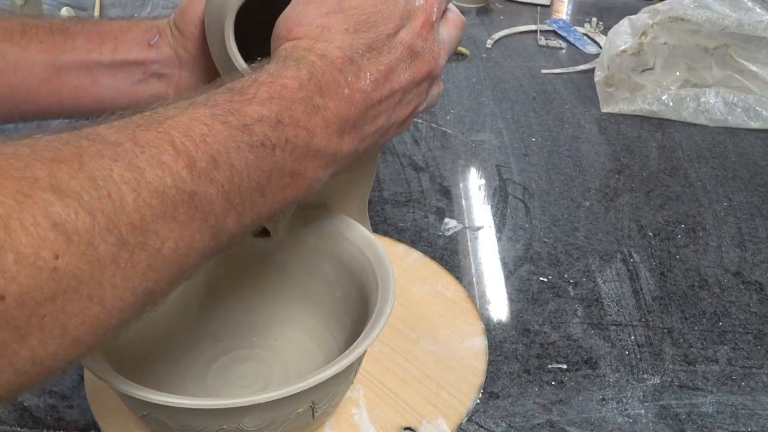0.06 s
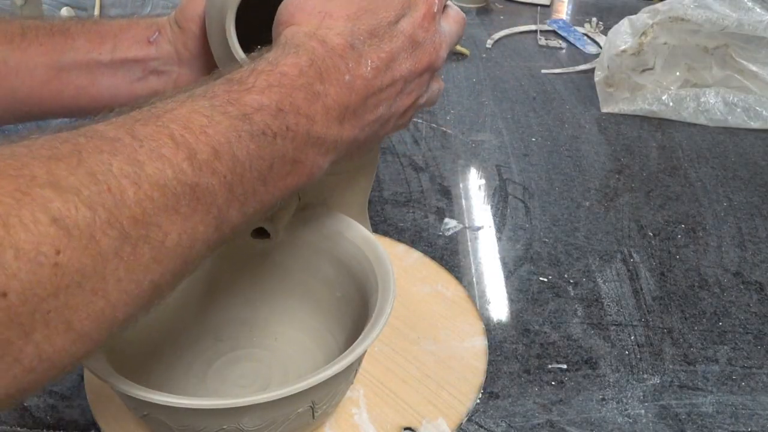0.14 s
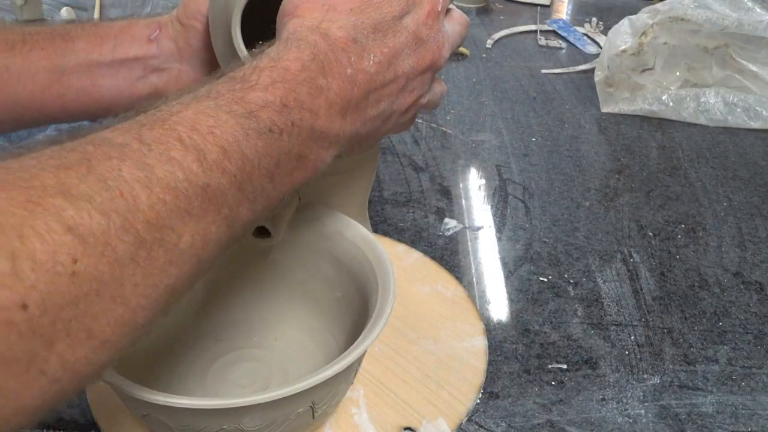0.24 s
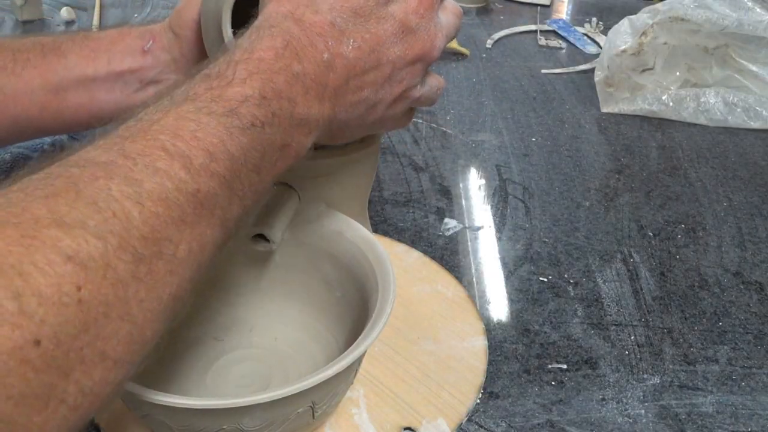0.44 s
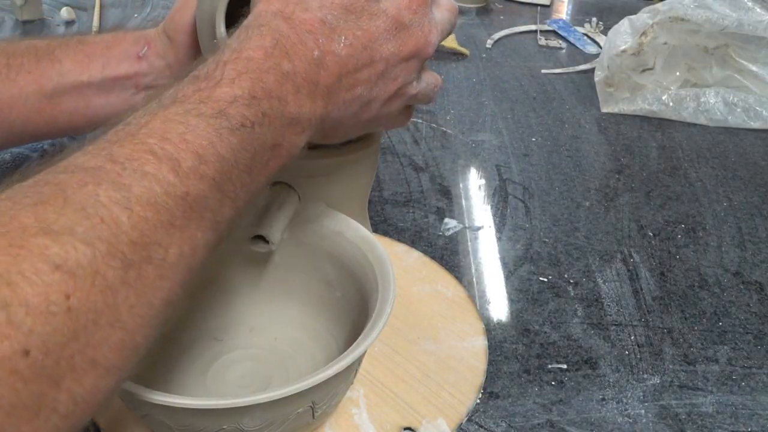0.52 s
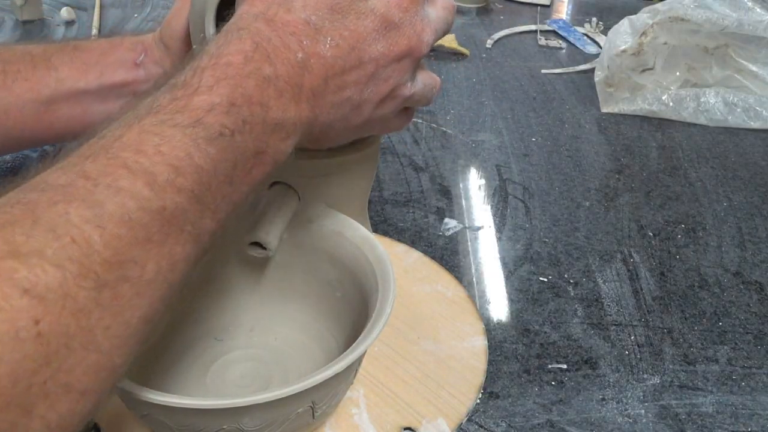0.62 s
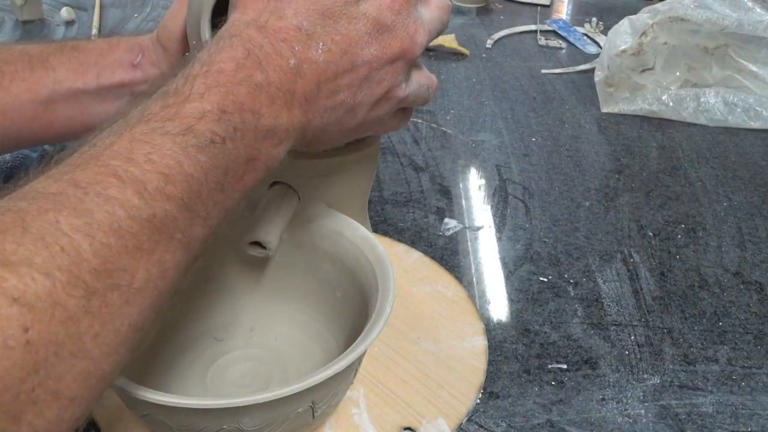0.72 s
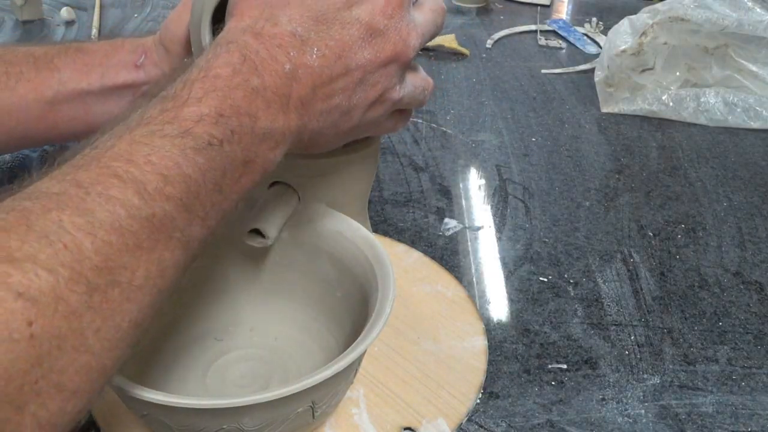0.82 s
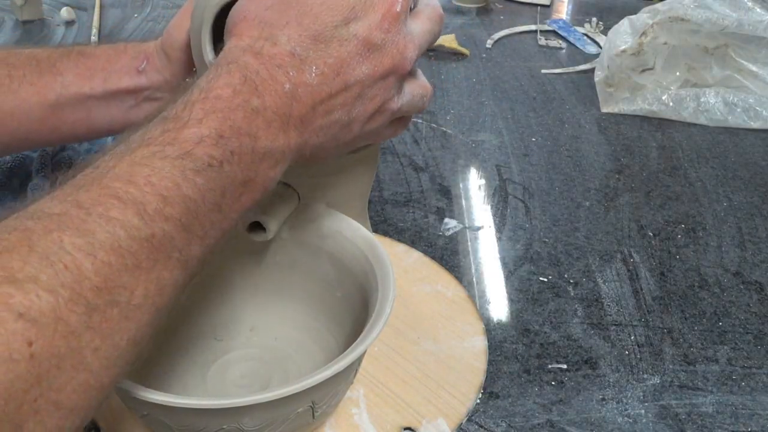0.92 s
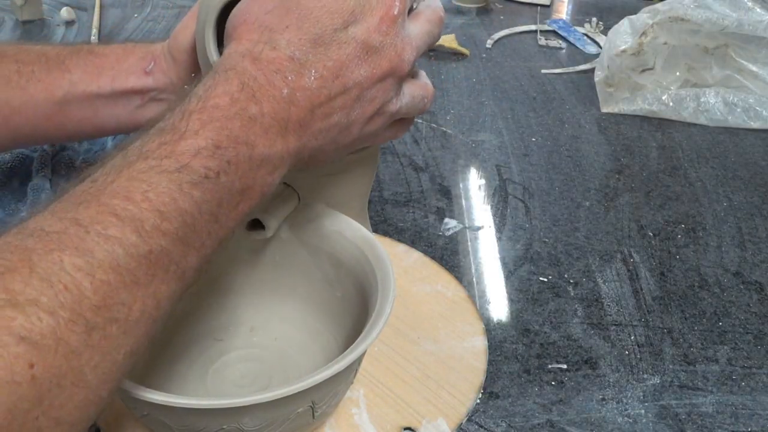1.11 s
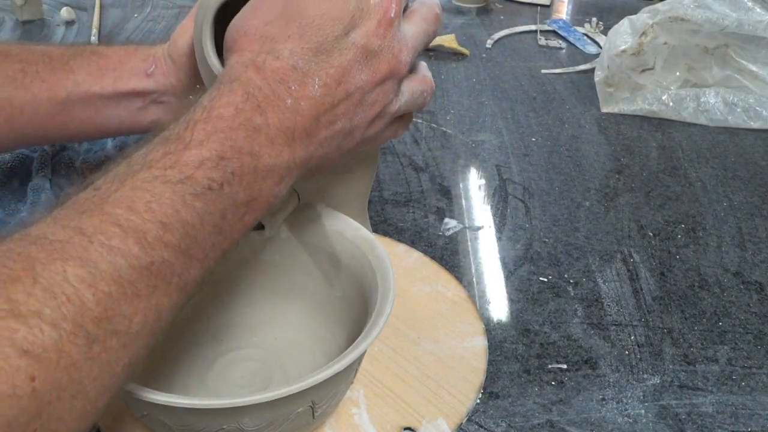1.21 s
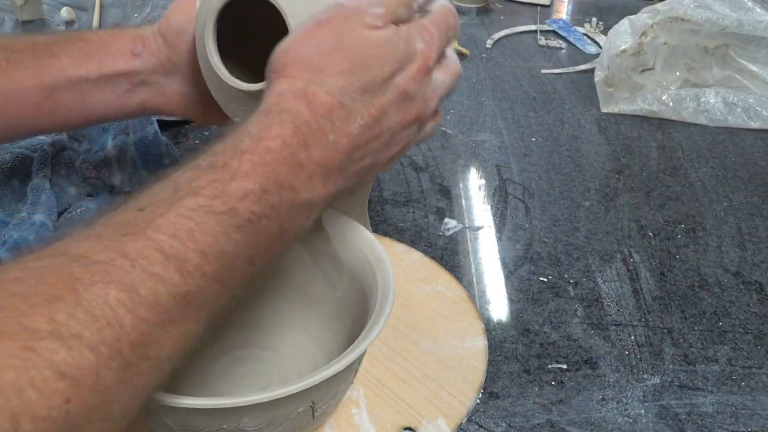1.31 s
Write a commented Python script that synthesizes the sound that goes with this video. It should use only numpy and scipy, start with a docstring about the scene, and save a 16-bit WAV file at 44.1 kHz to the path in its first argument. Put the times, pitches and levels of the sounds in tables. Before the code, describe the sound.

Damp clay scrapes against a pot, close and slightly left in a small studio. A light touch and soft rub at about 0.1 seconds lead into one firm, gritty scrape at 0.2 seconds, the loudest sound, ringing slightly and gone by 0.4. Fingers then smooth the clay very faintly, with a small wet tick at 1.1 seconds. Quiet hiss and low rumble continue throughout.

```python
"""Damp clay scraped against a pot

In a small studio, hands shift a piece of damp clay: a light touch, a soft rub, then one firm scrape.
Thousands of tiny gritty slips make the pot and the work table ring, and nearby walls echo.
Afterwards fingers faintly smooth the clay, with a few small wet ticks, over hiss and a low rumble."""
import sys
import numpy as np
from scipy import signal
from scipy.fft import rfft, irfft, next_fast_len
from scipy.io import wavfile

SR = 44100
rng = np.random.default_rng(int(sys.argv[2]) if len(sys.argv) > 2 else 0)


def materialize(psi):
    """Save the field psi as 16-bit PCM at rate SR to the path in sys.argv[1].

    A 1-D psi becomes a single channel; in a 2-D psi each row is a channel.
    """
    bounded = np.clip(np.atleast_2d(psi).T, -1, 1)
    quanta = np.round(bounded * 32767).astype(np.int16)
    wavfile.write(sys.argv[1], SR, quanta)


N = 59535
T = np.arange(N) / SR


def amp(db):
    """Turn decibels into a number to multiply by."""
    return 10 ** (np.asarray(db) / 20)


def unit(x):
    """Scale a signal so its average strength (rms) is 1."""
    return x / np.sqrt(np.mean(x ** 2) + 1e-20)


def along(points, hz):
    """Read between (Hz, value) points on a logarithmic frequency scale."""
    freqs, values = np.transpose(points)
    return np.interp(np.log(hz + 1), np.log(freqs + 1), values)


def filtered(x, response):
    """Multiply each frequency in x by the gain response(hz)."""
    size = next_fast_len(N + SR // 2)
    return irfft(rfft(x, size) * response(np.fft.rfftfreq(size, 1 / SR)), size)[..., :N]


def below(x, edge_hz):
    """Keep the part of x that is lower than edge_hz."""
    return filtered(x, lambda hz: 1 / (1 + (hz / edge_hz) ** 6))


def stereo_noise(colour, likeness):
    """Noise with a given tone colour; likeness 1 makes left and right the same, 0 unrelated."""
    def gains(hz):
        angle = np.arccos(along(likeness, hz)) / 2
        return amp(along(colour, hz)) * [np.cos(angle), np.sin(angle)]
    mid, side = filtered(rng.standard_normal((2, N)), gains)
    return unit(np.array([mid + side, mid - side]))


def background(rumble_db=-64.5):
    """The room's nearly steady hiss over a low rumble."""
    # Each row: frequency in Hz, relative level in dB.
    hiss_colour = [(50, -28), (100, -5), (200, -8), (450, -6.5), (1000, -9), (1600, -12), (3100, -17),
                   (5000, -22), (8000, -25), (9500, -26.5), (11000, -25.5)]
    rumble_colour = [(15, -9), (30, -5), (46, 1), (60, -9), (100, -16), (200, -25.5), (500, -79)]
    # Each row: time in seconds, level in dB.
    hiss_levels = [(0, -60.5), (.4, -59), (.7, -60.5), (.95, -61.5), (1.2, -60), (1.35, -61)]
    # Each row: frequency in Hz, how alike left and right are.
    hiss_likeness = [(100, .3), (400, -0.025), (1500, -0.13), (8000, 0.086)]
    hiss = amp(np.interp(T, *np.transpose(hiss_levels))) * stereo_noise(hiss_colour, hiss_likeness)
    return hiss + amp(rumble_db) * stereo_noise(rumble_colour, likeness=[(1, .67)])


def studio(x, echoes=24, echo_span_s=.012, echoes_db=-7.5, tail_db=-10.5):
    """Add quick echoes off the table and walls, and a short fading tail, different on each side."""
    # Each row: frequency in Hz, seconds the tail takes to fade by 60 dB.
    fade_times = [(250, 0.31), (1000, 0.27), (3000, 0.2), (9000, 0.19)]
    hz, t, noise = signal.stft(rng.standard_normal((2, SR // 2)), SR, nperseg=256)
    fade = amp(-60 * t / along(fade_times, hz)[:, None])
    tail = signal.istft(noise * fade, SR, nperseg=256)[1]
    response = amp(tail_db) * tail / np.linalg.norm(tail[0])
    for side in response:
        delays_s = echo_span_s * (np.arange(echoes) + 1 + rng.random(echoes)) / echoes
        side[(SR * delays_s).astype(int)] += amp(echoes_db) * rng.choice([-1, 1], echoes) / np.sqrt(echoes)
    response[:, 0] += 1  # the sound that arrives directly
    response /= np.linalg.norm(response, axis=1, keepdims=True)
    return signal.fftconvolve(x, response, axes=1)[:, :N]


def finger_rubs():
    """Fingers slide over damp clay, each rub a soft swell of noise."""
    # Each row: middle and half length in seconds, level in dB, centre in Hz, width in octaves.
    rubs = [(0.063, 0.011, -67.5, 427, 0.22), (0.072, 0.012, -70.5, 6500, 0.94), (0.21, .005, -58, 210, .7),
            (.55, 0.022, -71.5, 5850, 0.74), (0.652, 0.067, -68, 700, 1.1), (0.783, 0.0061, -63, 520, 0.45),
            (1.112, .013, -64, 4200, 0.48), (1.119, 0.041, -71, 2100, .3), (1.275, 0.028, -68, 2330, 0.22),
            (1.322, 0.03, -67.5, 980, 1)]
    out = np.zeros(N)
    for middle, half, db, centre, width in rubs:
        band = lambda hz: np.exp(-.5 * (np.log2((hz + 1) / centre) / width) ** 2)
        swell = np.exp(-.5 * ((T - middle) / half) ** 2)
        out += amp(db) * swell * unit(filtered(rng.standard_normal(N), band))
    return out


def wet_ticks(ring_fade_s=.0028, crack_fade_s=.003, crack_db=-13):
    """Clay lets go of the skin with tiny pops: a very short tone plus a crack of noise."""
    # Each row: start in seconds, level in dB, pitch in Hz.
    ticks = [(.860, -54, 9500), (1.0945, -50, 2070), (1.1037, -40.5, 2100), (1.1039, -40, 5000)]
    out = np.zeros(N)
    for start, db, hz in ticks:
        t = np.maximum(T - start, 0)
        ring = np.sin(2 * np.pi * hz * t) * amp(-60 * t / ring_fade_s)
        crack = amp(crack_db - 60 * t / crack_fade_s) * rng.standard_normal(N)
        out += amp(db) * (T >= start) * (ring + crack)
    return out


def pot_response(hz):
    """The pot and table ring when shaken near their own natural pitches."""
    # Each row: pitch in Hz, width in Hz (narrower rings longer), relative level in dB.
    resonances = [(411, 19, -11), (660, 30, -11), (970, 66, -9.5), (1499, 18, 0.5), (1632, 26, -3),
                  (1818, 45, -3.5), (2207, 32, 2.5), (2557, 36, 4), (2790, 30, -7), (3220, 87, -9),
                  (4280, 40, -13), (4440, 35, -9.5), (4755, 34, -6), (4977, 27, -1.5)]
    return sum(amp(db) * 1j * hz * width / (pitch ** 2 - hz ** 2 + 1j * hz * width)
               for pitch, width, db in resonances)


def clay_friction(slips_per_s=4000, scatter_db=2.5, own_share=.57):
    """Tiny random slips mixed equally with smooth rubbing noise, partly shared by left and right."""
    slips = (rng.random((3, N)) < slips_per_s / SR) * rng.choice([-1, 1], (3, N))
    sizes = amp(scatter_db * np.clip(rng.standard_normal((3, N)), -2, 2))
    parts = unit(unit(slips * sizes) + rng.standard_normal((3, N)))  # shared, left, right
    return np.sqrt(1 - own_share) * parts[0] + np.sqrt(own_share) * parts[1:]


def scrapes(body_hz=1290, body_cut=.62, body_fill_s=.021, grit_hz=3540, grit_fade_ratio=1.08):
    """Each stroke of clay on clay swells, holds and fades, heard directly and through the pot."""
    # Each row: time of full force, time to rise 30 dB, time held and time to fall 60 dB, all in
    # seconds, then level in dB, firmness from 0 to 1, ring in dB compared with the direct sound.
    strokes = [(.1025, .022, .005, .04, -50, .5, -25), (.134, .032, 0.021, 0.08, -39.3, 0, -11.5),
               (.2135, .011, .047, .105, -27, 0.99, -6.5)]
    # Tone of a soft rub and of a firm scrape. Each row: frequency in Hz, relative level in dB.
    soft_colour = [(80, -23), (170, -10), (280, -18), (450, -6), (750, 0), (1000, 1), (1550, -12),
                   (2200, -5.5), (2900, -2), (4200, -12.5), (5800, -16.5), (8500, -22.5), (11000, -25)]
    firm_colour = [(120, -32), (210, -26.5), (300, -15), (550, -9.5), (950, -7.5), (1750, -3.5), (2550, -1),
                   (3050, -8), (3700, -8), (4500, -5.5), (5700, -14), (6900, -13), (8300, -22),
                   (11000, -27.5)]
    out = np.zeros((2, N))
    for full, rise, hold, fall, db, firmness, ring_db in strokes:
        swell = amp(-30 * np.maximum(full - T, 0) / rise)
        release = amp(-60 * np.maximum(T - full - hold, 0) / fall)
        friction = clay_friction()
        body = below(friction, body_hz)
        grit = friction - below(friction, grit_hz)
        # The low body starts thin and fills in as the contact widens.
        thinning = body_cut * np.exp(-np.maximum(T - full, 0) / body_fill_s)
        lower_part = friction - grit - thinning * body
        # The high grit dies a little faster as the pressure lets up.
        force = swell * (release * lower_part + release ** grit_fade_ratio * grit)
        colour = lambda hz: amp((1 - firmness) * along(soft_colour, hz) + firmness * along(firm_colour, hz))
        direct = unit(filtered(force, colour))
        ring = amp(ring_db) * unit(filtered(force, pot_response))
        out += amp(db) * np.sqrt(np.mean(force ** 2)) * unit(direct + ring)
    return out


def scene(pan_db=1.46):
    """The clay work sits a little to the left in the studio, over the background."""
    clay = studio(scrapes() + wet_ticks() + finger_rubs())
    return clay * amp([[pan_db], [-pan_db]]) + background()


def record(dry, top_hz=11130):
    """Cut away the highest treble."""
    return filtered(dry, lambda hz: hz < top_hz)


dry = scene()
out = record(dry)
materialize(out)
```